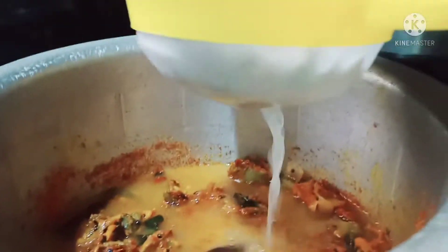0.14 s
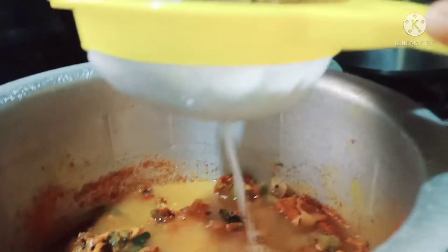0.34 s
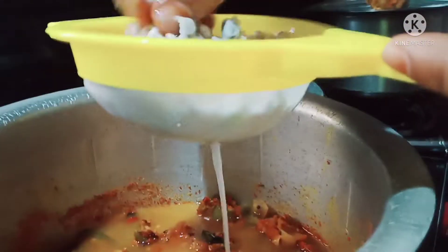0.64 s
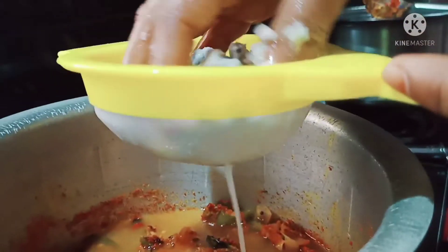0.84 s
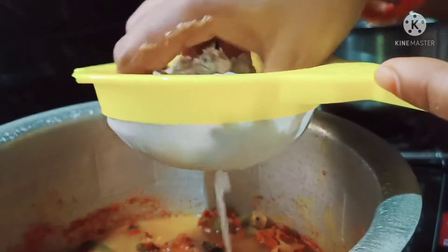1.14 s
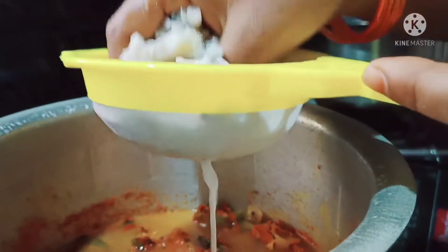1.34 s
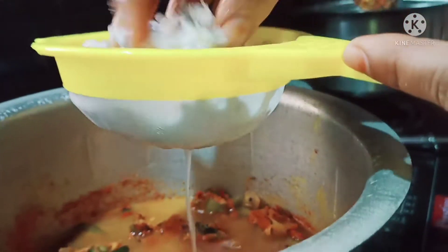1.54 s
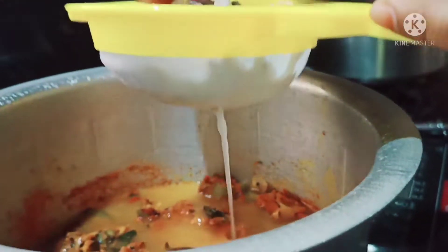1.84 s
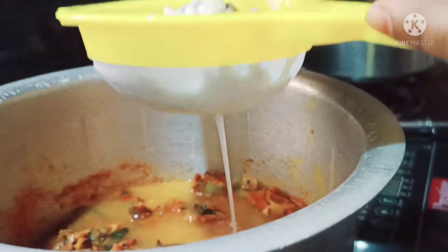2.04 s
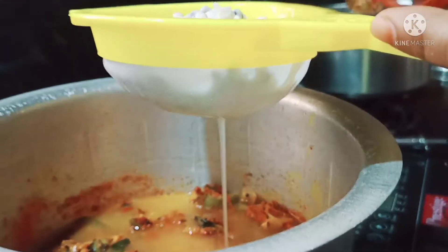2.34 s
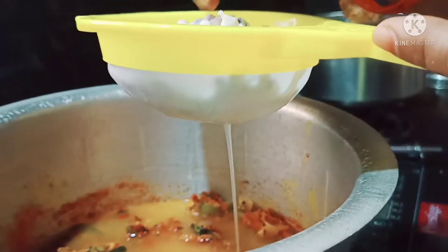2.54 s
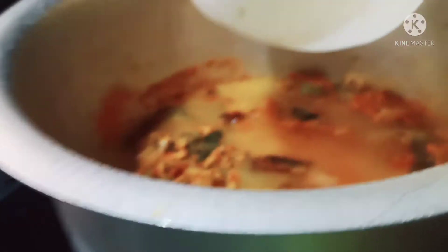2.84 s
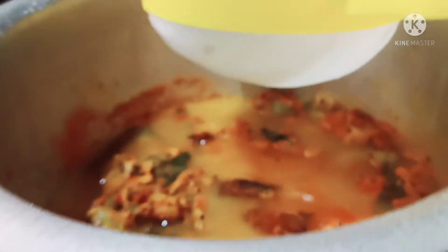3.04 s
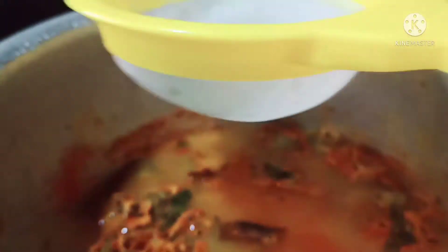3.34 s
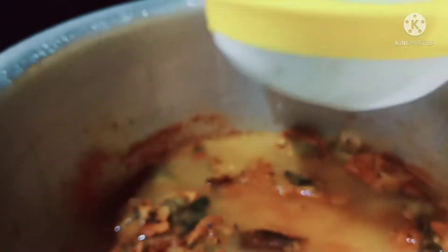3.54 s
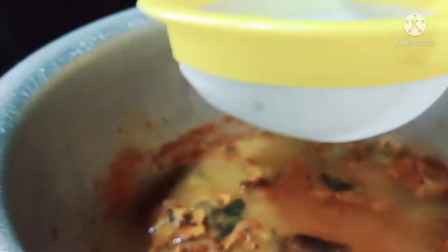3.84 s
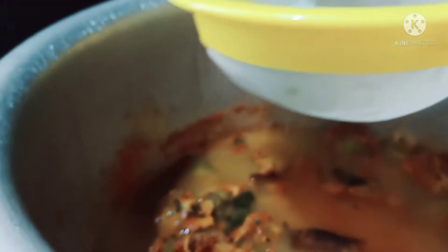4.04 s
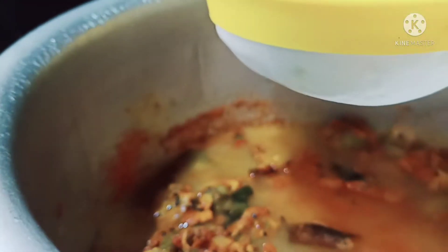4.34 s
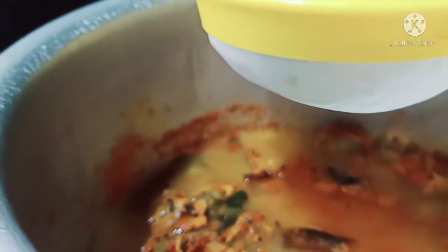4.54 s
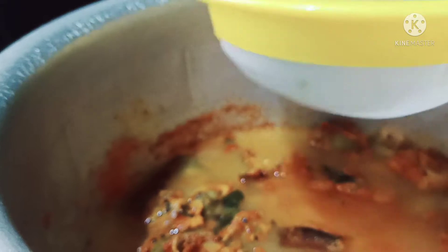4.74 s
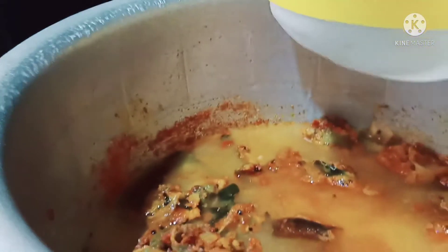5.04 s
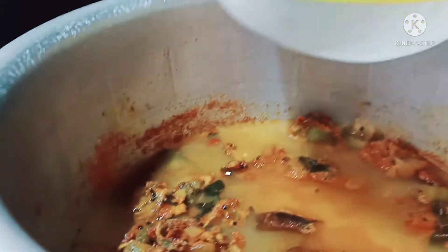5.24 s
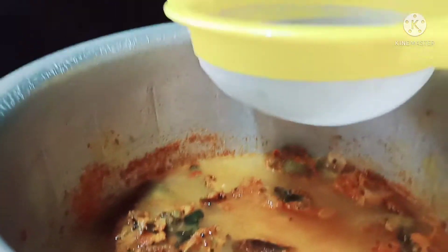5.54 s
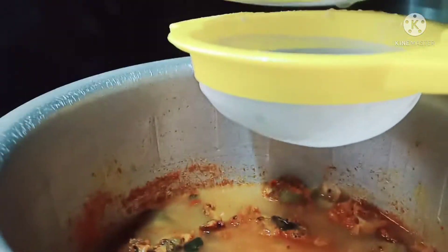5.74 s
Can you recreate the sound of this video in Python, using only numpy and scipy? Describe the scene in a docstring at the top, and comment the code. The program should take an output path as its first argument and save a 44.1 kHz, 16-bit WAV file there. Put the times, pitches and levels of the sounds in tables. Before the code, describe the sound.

Liquid squeezed from wet pulp through a mesh strainer trickles into soup. Tiny ringing bubbles, fizzy crackle and snapping films echo briefly off the pot walls and kitchen. The flow thins in spurts, leaving isolated plips and almost nothing by five seconds. Low handling rumble and thuds, faint bird whistles, and finally a light high metallic tick.

```python
"""Squeezing pulp over a soup pot

In a small kitchen a hand squeezes wet pulp in a mesh strainer; a thin stream, made of tiny ringing bubbles
and hiss, trickles into a steel pot of soup and dwindles to drips. Wet films snap as bursts of noise and larger
bubbles ring as rising sines, echoed by the pot and the room. The hand-held microphone is bumped with low rings,
something metal ticks once, a small bird whistles far away; faint tones, a short rising bubble and room tone
lie underneath."""
import sys
import numpy as np
from scipy import signal
from scipy.fft import rfft, irfft, next_fast_len
from scipy.io import wavfile

SR = 44100
rng = np.random.default_rng(int(sys.argv[2]) if len(sys.argv) > 2 else 0)


def to_wav(s):
    """Save 16-bit WAV."""
    ch = np.atleast_2d(s).T  # columns
    pcm = np.round(np.clip(ch, -1, 1) * 32767)  # PCM
    wavfile.write(sys.argv[1], SR, pcm.astype(np.int16))


N = 260055
TIME = np.arange(N) / SR


def from_db(db):
    """Decibels to gain."""
    return 10 ** (np.asarray(db) / 20)


def rms_one(x):
    """Scale to unit rms."""
    return x / np.sqrt(np.mean(x ** 2) + 1e-20)


def in_time(rows, t):
    """Each column of a curve table, interpolated at the times t."""
    s, *columns = np.transpose(rows)
    return [np.interp(t, s, column) for column in columns]


def seconds(length):
    """A time axis of the given length in seconds."""
    return np.arange(int(length * SR)) / SR


def dying(t, t60):
    """Exponential decay by 60 dB in t60 seconds."""
    return np.exp(-np.log(1000) * t / t60)


def sweep(hz):
    """A sine whose frequency follows the curve hz."""
    return np.sin(2 * np.pi * np.cumsum(hz) / SR)


def drift(count, rate_hz):
    """Random wander around zero with unit-spread knots, joined by straight lines."""
    knots = np.arange(count) * rate_hz / SR
    return np.interp(knots, np.arange(4000), rng.standard_normal(4000))


def add(out, s, sound):
    """Mix a sound in at time s."""
    i = max(int(s * SR), 0)
    out[i:i + len(sound)] += sound[:max(len(out) - i, 0)]


def band(x, hz, kind, order=2):
    """Causal Butterworth filter."""
    edges = np.clip(hz, 10, .45 * SR)
    return signal.sosfilt(signal.butter(order, edges, kind, fs=SR, output="sos"), x)


def coloured(x, spectrum):
    """Give a steady signal a spectrum, with steep skirts beyond its ends; rms 1."""
    hz, db = np.transpose(spectrum)
    size = next_fast_len(len(x) + SR // 4)
    f = np.maximum(np.fft.rfftfreq(size, 1 / SR), 1)
    skirts = np.minimum(1, np.minimum(f / hz[0], hz[-1] / f)) ** 4
    gain = from_db(np.interp(np.log(f), np.log(hz), db)) * skirts
    return rms_one(irfft(rfft(x, size) * gain, size)[:len(x)])


def noise(spectrum):
    """Coloured noise, rms 1."""
    return coloured(rng.standard_normal(N), spectrum)


def echoes(x, t60, gap_s, dull_hz):
    """Dense reflections, of unit energy before a treble cut, fade in after a gap and die away."""
    t = seconds(.8)
    tail = rng.standard_normal(len(t)) * dying(t, t60) * np.clip(t / gap_s - 1, 0, 1)
    tail = band(tail / np.sqrt(np.sum(tail ** 2)), dull_hz, "low")
    return signal.fftconvolve(x, tail)[:len(x)]


def pot_walls(x, lap_s=.0021, loss_db=1.52, first_db=-3.0, count=10):
    """A short sound bounces between the steel walls, by other paths from every spot in the pot."""
    out = np.concatenate([x, np.zeros(len(seconds(.04)))])
    for k, (slip, sign) in enumerate(rng.uniform(-.5, .5, (count, 2)), 1):
        add(out, (k + slip) * lap_s, np.sign(sign) * from_db(first_db - loss_db * k) * x)
    return out


# Gushes of liquid let go by the pulp, close above the pot. Each row: start in seconds, length in seconds,
# splash level in dB, fizz level in dB; both levels are nominal.
GUSHES = [(0.0, 0.04, -56, -55), (0.074, 0.088, -54.5, -62), (0.482, 0.082, -51, -65),
          (0.765, 0.094, -50, -58.5), (1.011, 0.12, -53, -57), (1.277, 0.048, -58.5, -66),
          (1.347, 0.1, -54, -74), (1.745, 0.167, -62.5, -59), (1.931, 0.15, -60, -65),
          (2.105, 0.047, -61.5, -58.5), (2.68, 0.028, -57.5, -62), (2.924, 0.18, -64, -65.5),
          (3.184, 0.1, -53, -65.5), (3.464, 0.16, -58, -69), (3.779, 0.054, -61, -87),
          (4.286, 0.056, -66.5, -65), (4.503, 0.073, -54.5, -70), (4.906, 0.087, -69, -87)]
GUSH_ATTACK_S, GUSH_T60_S = 0.0093, .12


def gushes():
    """Each gush swells quickly, holds and drains away: gains of the splash and of the fizz."""
    power = np.zeros((2, N))
    for s, length, splash_db, fizz_db in GUSHES:
        t = TIME - s
        shape = np.clip(t / GUSH_ATTACK_S, 0, 1) * dying(np.maximum(t - length, 0), GUSH_T60_S)
        power += (from_db([[splash_db], [fizz_db]]) * shape) ** 2
    return np.sqrt(power)


# The steady stream into the pot, and the unrest of the hand at the microphone. Each row: time in seconds,
# nominal splash level in dB, nominal handling rumble level in dB.
FLOW = [(0.0, -41, -56), (0.32, -54, -56.5), (0.68, -52, -64.5), (0.98, -57, -55.5), (1.09, -59.5, -64),
        (1.77, -62.5, -71.5), (1.98, -53, -64), (2.25, -63, -68.5), (2.54, -60, -74), (3.07, -60.5, -68),
        (3.4, -54.5, -65.5), (3.78, -63, -72), (4.12, -64, -72.5), (4.54, -61, -69), (4.73, -69, -69),
        (5.02, -70.5, -82), (5.6, -73.5, -76), (5.78, -64.5, -65)]
# at a full stream the fizz has its reference level; it follows the stream by so many dB per dB
FULL_DB, STREAM_TRIM_DB = -55, -3
FIZZ_DB, FIZZ_FOLLOWS = -66, 1.01
# below this level the stream breaks up, and loses so many dB more per dB
BREAKUP_DB, BREAKUP_LOSS = -66.5, 1.3


def flow():
    """Levels in dB of splash and fizz: the steady stream, failing as it thins, plus the gushes."""
    stream_db, _ = in_time(FLOW, TIME)
    breakup_db = BREAKUP_LOSS * np.maximum(BREAKUP_DB - stream_db, 0)
    stream_db = stream_db + STREAM_TRIM_DB - breakup_db
    steady = from_db([stream_db, FIZZ_DB + FIZZ_FOLLOWS * (stream_db - FULL_DB)])
    return 20 * np.log10(np.hypot(steady, gushes()))


def bubble(hz, t60, rise, attack_s):
    """A pocket of air rings, and its pitch climbs as it nears the surface."""
    t = seconds(t60)
    return sweep(hz * (1 + rise * t / t60)) * dying(t, t60) * (1 - np.exp(-t / attack_s))


def swarm(count, low_hz, high_hz, cycles, rise, spread_db):
    """Many tiny bubbles of random moment, pitch, size and damping."""
    out = np.zeros(next_fast_len(N))
    for when, pitch, size, damping in rng.random((count, 4)):
        hz = low_hz * (high_hz / low_hz) ** pitch
        ring = bubble(hz, cycles * (.5 + damping) / hz, rise, attack_s=0.00013)
        add(out, when * N / SR, from_db(spread_db * size ** 2) * ring)
    return out


# The stream meeting the soup, heard close. Each row: frequency in Hz, relative level in dB per Hz.
SPLASH = [(260, -45), (450, -4), (772, -15.5), (1220, -6), (1440, -12), (1670, -1), (2100, -0.5), (3030, 6),
          (4520, 5.5), (6170, 2), (7000, -19), (9100, -34.5), (15400, -120)]
# The crackle of the wet pulp above it. Each row: frequency in Hz, relative level in dB per Hz.
FIZZ = [(6000, -1), (7000, 0), (8300, -11), (10000, -5.5), (11500, 0.5), (13000, -8.5), (15500, -2.5)]


def trickle(splash_db, fizz_db):
    """The stream folds small bubbles into the soup, blurred by the pot; wet pulp crackles above them."""
    small = swarm(count=5000, low_hz=550, high_hz=7500, cycles=28, rise=.15, spread_db=20)
    tiny = swarm(count=6000, low_hz=5500, high_hz=15000, cycles=18, rise=.05, spread_db=18)
    bubbling = rms_one(small + echoes(small, t60=.07, gap_s=.0007, dull_hz=12000))[:N]
    crackling = rms_one(tiny + .7 * echoes(tiny, t60=.05, gap_s=.0007, dull_hz=16000))[:N]
    # a weak stream traps few bubbles and mostly hisses
    grainy = np.interp(splash_db, [-70, -57], [.2, .8])
    hiss = np.sqrt(1 - grainy) * rng.standard_normal((2, N))
    splash = coloured(np.sqrt(grainy) * bubbling + hiss[0], SPLASH)
    fizz = coloured(np.sqrt(grainy) * crackling + 0.67 * hiss[1], FIZZ)
    # a strong stream breaks up unevenly
    spurts = from_db(3.5 * grainy * drift(N, rate_hz=90))
    return spurts * (from_db(splash_db - 2.27) * splash + from_db(fizz_db + 1.5) * fizz)


def plip(hz, t60):
    """A bubble pinches off with a wet spit, then rings around its own pitch between the pot walls."""
    ring = bubble(hz * 0.9746, t60, rise=0.28, attack_s=0.00005)
    spit = band(rng.standard_normal(len(ring)), [hz * 0.62, hz * 1.17], "band") * dying(seconds(t60), t60)
    return pot_walls(ring + from_db(-1.0) * spit)


# The loudest bubbles in the soup, heard close; those that burst at once ring briefly. Each row: start in
# seconds, nominal pitch in Hz, nominal level in dB, decay time t60 in seconds.
BUBBLES = [(0.0822, 1146, -33.5, 0.017), (0.082, 2320, -34.5, 0.01), (0.101, 3970, -39.5, 0.075),
           (0.1183, 6230, -26.5, 0.012), (0.16, 5900, -39.5, 0.016), (0.349, 951, -38, 0.052),
           (0.3535, 2740, -43.5, 0.038), (0.4717, 2420, -23.5, 0.0095), (0.4858, 5200, -36, .025),
           (0.4955, 2890, -22.5, 0.0073), (0.5074, 364, -36, 0.018), (0.514, 5980, -29.5, 0.0067),
           (0.5602, 2750, -32, 0.005), (0.6436, 4200, -47, 0.025), (0.732, 4900, -36.5, 0.0093),
           (0.782, 3770, -28.5, 0.0053), (0.804, 2970, -39, 0.041), (0.8378, 6940, -30.5, .0056),
           (0.901, 6620, -32.5, 0.014), (0.9065, 6500, -28, 0.0095), (1.017, 1860, -36.5, 0.012),
           (1.018, 3780, -32, 0.011), (1.0237, 5220, -34, 0.015), (1.0944, 3780, -29.5, 0.004),
           (1.1245, 414, -42, 0.05), (1.374, 3040, -44, .024), (1.3792, 1010, -41.5, 0.013),
           (1.5093, 4300, -48.5, 0.021), (1.6919, 1800, -53, 0.025), (1.7256, 1795, -53, .04),
           (1.7653, 3060, -48.5, .084), (1.7913, 6700, -33, .006), (1.8247, 2830, -41, .018),
           (1.85, 6300, -40, .026), (1.8649, 1240, -43.5, .009), (1.8986, 2310, -41, 0.037),
           (1.935, 6350, -40, .02), (2.0297, 7050, -41, .011), (2.031, 2000, -44, .022),
           (2.2073, 2240, -51, 0.05), (2.4635, 3680, -47.5, 0.033), (2.6779, 6830, -34, 0.0087),
           (2.6821, 5190, -35.5, 0.0094), (2.6862, 1274, -43.5, 0.042), (2.705, 1850, -39.5, 0.019),
           (2.812, 2140, -47, 0.021), (3.162, 5070, -34, 0.011), (3.194, 3130, -37.5, .047),
           (3.2302, 2390, -32.5, 0.0054), (3.2356, 3760, -34, 0.02), (3.2693, 1020, -46, 0.028),
           (3.3691, 1640, -34, .019), (3.4759, 6140, -43, 0.022), (3.49, 1205, -42.5, 0.039),
           (3.6369, 1910, -42, 0.015), (3.8103, 4140, -47, .044), (4.2965, 4840, -46, 0.058),
           (4.2971, 2880, -43, 0.012), (4.4998, 5540, -38, 0.026), (4.5041, 3860, -32, .019),
           (4.5072, 2360, -41.5, 0.033), (4.572, 1510, -46, 0.01), (4.913, 2450, -56.5, .022)]


def plips():
    """Large bubbles ring one by one in the soup."""
    out = np.zeros(N)
    for s, hz, db, t60 in BUBBLES:
        add(out, s, from_db(db + 0.5) * plip(hz, t60))
    return out


# Stray drops: how many, their nominal pitch range, their level against the stream, and how long they ring
DROPS_PER_S, DROP_LOW_HZ, DROP_HIGH_HZ = 26, 992, 6790
DROP_DB, DROP_SPREAD_DB, DROP_T60_S = 5, 0.5, 0.018


def drops(splash_db):
    """Stray drops fall at random, as strong as the flow that throws them."""
    out = np.zeros(N)
    for when, pitch, size in rng.random((int(DROPS_PER_S * N / SR), 3)):
        db = splash_db[int(when * N)] + DROP_DB + DROP_SPREAD_DB * (2 * size - 1)
        hz = DROP_LOW_HZ * (DROP_HIGH_HZ / DROP_LOW_HZ) ** pitch
        add(out, when * N / SR, from_db(db) * plip(hz, DROP_T60_S))
    return out


# The loudest wet films snapping in the pulp and the mesh, heard close. Each row: start in seconds,
# nominal level in dB, nominal level of the body relative to the treble in dB.
SNAPS = [(0.031, -36, -24), (0.0984, -32, -10), (0.153, -38, 1), (0.199, -39.5, -6), (0.2346, -20, -24),
         (0.348, -37, -5), (0.5131, -46, -8), (0.77, -30.5, 1), (0.838, -37, -3), (1.0165, -31, -7.5),
         (1.504, -49, 12.5), (1.5622, -40, -5.5), (1.7388, -45.5, -4), (2.1058, -33.5, -11),
         (2.3877, -38.5, -4.5), (2.9617, -50, -5), (3.5468, -35.5, -24), (4.118, -54, 5),
         (4.296, -36.5, -28), (4.5065, -42.5, -1), (5.276, -50, -30), (5.8245, -48.5, 8)]


def snaps():
    """A bursting film gives a bright crack and a duller, slightly longer smack."""
    out, t = np.zeros(N), seconds(.04)
    for s, db, body_db in SNAPS:
        white = rng.standard_normal((2, len(t)))
        # the break itself, then flying spray
        burst = .95 * dying(t, t60=.003) + .7 * dying(t, t60=.022)
        crack = band(white[0] * burst, [6000, 13500], "band")
        smack = band(white[1] * dying(t, t60=0.034), [900, 4500], "band")
        add(out, s, pot_walls(from_db(db - 5.0) * crack + from_db(db + body_db - 3.5) * smack))
    return out


# The air inside the pot. Each row: frequency in Hz, relative level in dB per Hz.
POT_AIR = [(110, -7.5), (190, -9), (248, -6), (297, -4.5), (319, 0), (355, 4), (436, -5), (494, -9.5),
           (800, -17.5), (1040, -18.5), (1760, -120)]
# its level at a full stream, and how many dB it follows per dB of splash
AIR_DB, AIR_FOLLOWS = -59.5, 0.63


def pot_air(splash_db):
    """The air in the pot booms softly, stirred by the stream."""
    return from_db(AIR_DB + AIR_FOLLOWS * (splash_db - FULL_DB)) * noise(POT_AIR)


# The metal tick. Each row: mode frequency in Hz, level in dB relative to the tick, decay time t60 in seconds.
TICK_MODES = [(3600, -2, 0.041), (9080, -7.5, 0.11), (11720, 0.5, 0.11), (11450, 0, .12)]
TICK_S, TICK_DB = 5.7922, -47


def tick():
    """A light touch on metal: a crack and a few high modes."""
    out, t = np.zeros(N), seconds(.2)
    ring = sum(from_db(db) * np.sin(2 * np.pi * hz * t) * dying(t, t60) for hz, db, t60 in TICK_MODES)
    crack = .8 * band(rng.standard_normal(len(t)), 2500, "high") * dying(t, t60=.02)
    add(out, TICK_S, from_db(TICK_DB) * (ring + crack))
    return out


def kitchen(near):
    """The small kitchen returns the near sounds as a dense, duller tail."""
    return from_db(-7.0) * echoes(near, t60=0.35, gap_s=0.0028, dull_hz=8480)


# Soft knocks on the microphone's housing. Each row: start in seconds, peak level in dB,
# brightness as a low-pass cutoff in Hz.
KNOCKS = [(0.514, -43.5, 300), (1.114, -44.5, 129), (1.136, -47, 150), (3.989, -31.5, 990),
          (5.419, -54, 170), (5.626, -50, 2200), (5.795, -47, 200), (5.827, -41, 600), (5.839, -39.5, 300)]


def knocks():
    """A dull push on the housing sets off three short, low, damped rings."""
    out, t = np.zeros(N), seconds(.12)
    modes = [(113, 0.49, 0.043), (380, -0.48, 0.028), (695, -1.17, 0.0056)]  # Hz, gain, t60 in seconds
    body = sum(gain * np.sin(2 * np.pi * hz * t) * dying(t, t60) for hz, gain, t60 in modes)
    for s, db, bright_hz in KNOCKS:
        thud = band(body, bright_hz, "low")
        add(out, s, from_db(db) * thud / np.abs(thud).max())
    return out


# Handling rumble in the hand-held microphone. Each row: frequency in Hz, relative level in dB per Hz.
RUMBLE = [(16, -47), (28, -25), (43, -22), (58, -8.5), (70, 2), (113, -1), (146, -6), (200, -4), (260, 2),
          (340, -31), (570, -120)]


def handling_rumble():
    """Low noise rises and falls with the hand's unrest."""
    _, rumble_db = in_time(FLOW, TIME)
    return from_db(rumble_db + 1.0) * noise(RUMBLE)


# Fingers shifting their grip on the microphone. Each row: time in seconds, level in dB.
GRIP = [(5.785, -100), (5.797, -55), (5.83, -50), (5.86, -52.5), (5.9, -56)]
# The spectrum of that rub. Each row: frequency in Hz, relative level in dB per Hz.
GRIP_COLOUR = [(24, -33), (40, 1), (382, -6), (1260, -28), (2390, -23), (5290, -18.5), (7680, -35),
               (11700, -32), (15000, -41)]


def grip():
    """Skin rubs as the fingers shift: coloured noise under a level curve."""
    grip_db, = in_time(GRIP, TIME)
    return from_db(grip_db) * noise(GRIP_COLOUR)


# The far bird's calls. Each row: start in seconds, nominal level in dB.
CHIRPS = [(4.65, -68), (4.92, -68), (5.185, -70.5), (5.44, -72.5), (5.71, -73)]
# The course of one call. Each row: time after its start in seconds, nominal pitch in Hz, relative level in dB.
CHIRP_SHAPE = [(0, 5600, 0), (.02, 5330, 3.5), (.05, 5296, 3), (.058, 4500, 7), (.075, 3950, 1),
               (.12, 3890, -5), (.18, 3850, -20), (.21, 3436, -6.5), (.29, 3420, -10)]


def bird():
    """Falling, fluttering whistles from far off, heard mostly as reflections."""
    out, t = np.zeros(N), seconds(CHIRP_SHAPE[-1][0])
    hz, shape_db = in_time(CHIRP_SHAPE, t)
    for s, db in CHIRPS:
        flutter = 1 + .09 * dying(t, t60=.35) * drift(len(t), rate_hz=200)
        level_db = db + shape_db + 5.8 * drift(len(t), rate_hz=78)
        add(out, s, from_db(level_db) * sweep(hz * flutter))
    return .3 * out + echoes(out, t60=.55, gap_s=.005, dull_hz=9000)


# Faint tones, and at 2.80 s a short rising bubble, under the trickle. Each row: start in seconds, length in
# seconds, nominal first pitch in Hz, nominal last pitch in Hz, nominal level in dB.
TONES_AND_BUBBLE = [(2.12, .38, 1580, 1690, -68), (2.80, .08, 2150, 2300, -57), (2.84, .3, 2600, 2660, -71),
                    (3.38, .42, 329, 329, -60), (5.25, .5, 325, 300, -75)]


def faint_tones_and_bubble():
    """Faint tones, and at 2.80 s a short rising bubble: gliding, wavering sines that swell and fade."""
    out = np.zeros(N)
    for s, length, first_hz, last_hz, db in TONES_AND_BUBBLE:
        t = seconds(length)
        hz = np.linspace(first_hz, last_hz, len(t)) * (1 + .012 * drift(len(t), rate_hz=120))
        swell = np.sqrt(np.abs(np.sin(np.pi * t / length))) * from_db(3 * drift(len(t), rate_hz=40))
        add(out, s, from_db(db) * swell * sweep(hz))
    return out


# The background at the microphone. Each row: frequency in Hz, relative level in dB per Hz.
ROOM_TONE = [(40, 0), (87, 2), (150, -3), (273, -0.5), (330, 7.5), (548, -13), (1310, -16), (2990, -20),
             (3840, -5), (5300, -16.5), (7700, -28), (15500, -27.5)]
ROOM_TONE_DB = -73


def room_tone():
    """Steady coloured noise lies under everything."""
    return from_db(ROOM_TONE_DB) * noise(ROOM_TONE)


def scene():
    """Liquid sounds in the pot and the kitchen, over handling noise and room tone."""
    splash_db, fizz_db = flow()
    near = trickle(splash_db, fizz_db) + plips() + drops(splash_db) + snaps() + tick()
    handling = knocks() + handling_rumble() + grip()
    background = bird() + faint_tones_and_bubble() + room_tone()
    return (near + kitchen(near) + pot_air(splash_db) + handling + background)[None]


CUTOFF_HZ = 15850


def record(dry):
    """The top is cut steeply by an elliptic low-pass."""
    return signal.sosfilt(signal.ellip(10, .1, 80, CUTOFF_HZ, fs=SR, output="sos"), dry)


dry = scene()
out = record(dry)
to_wav(out)
```